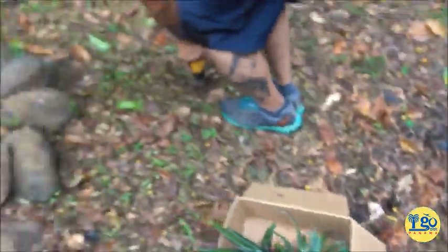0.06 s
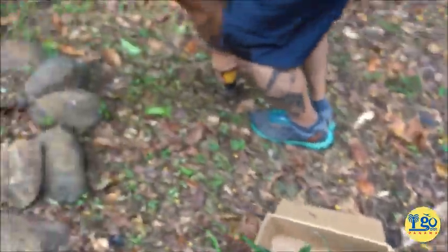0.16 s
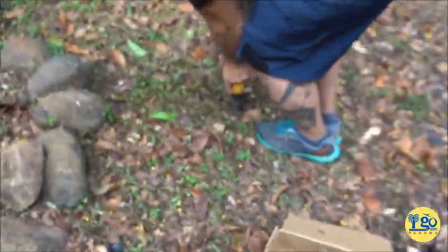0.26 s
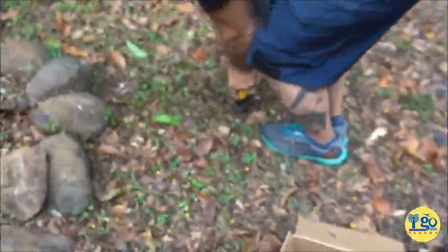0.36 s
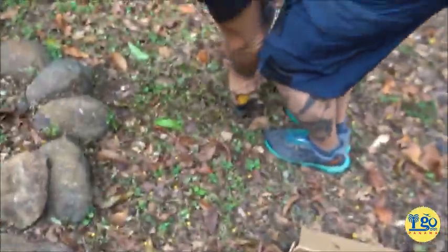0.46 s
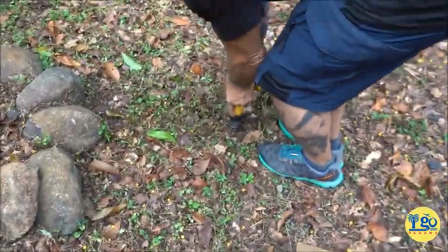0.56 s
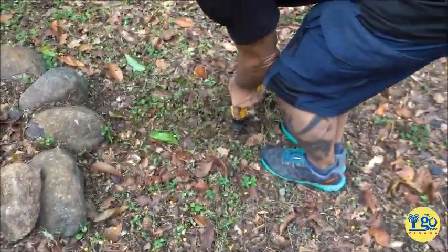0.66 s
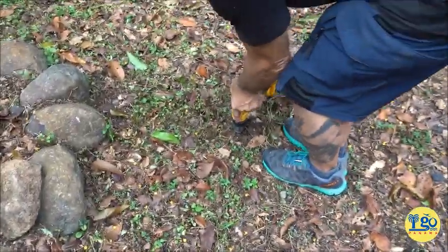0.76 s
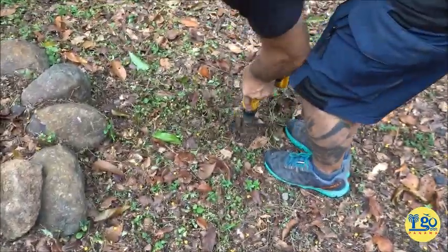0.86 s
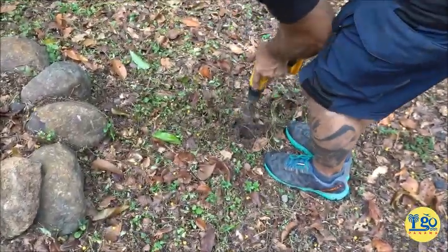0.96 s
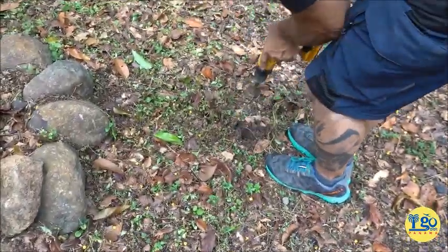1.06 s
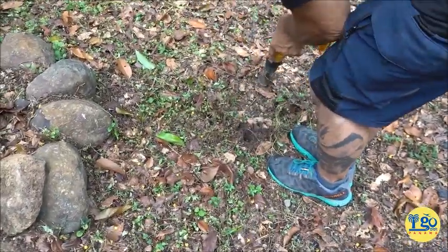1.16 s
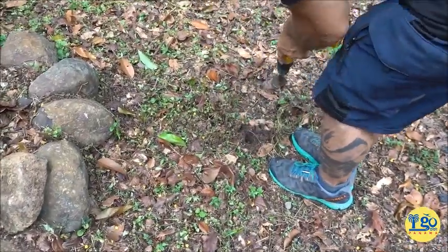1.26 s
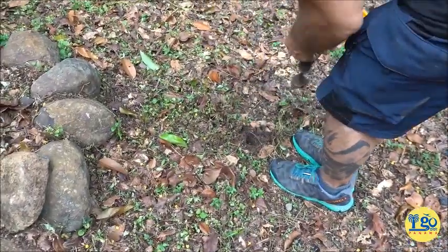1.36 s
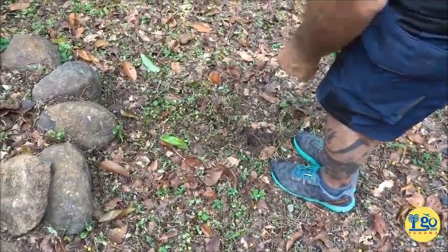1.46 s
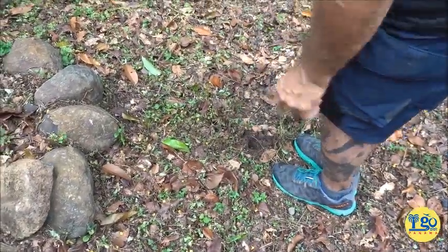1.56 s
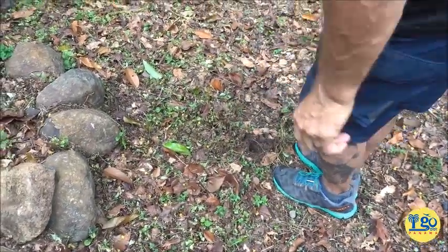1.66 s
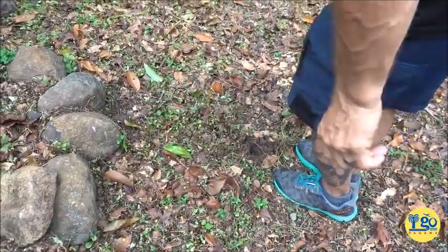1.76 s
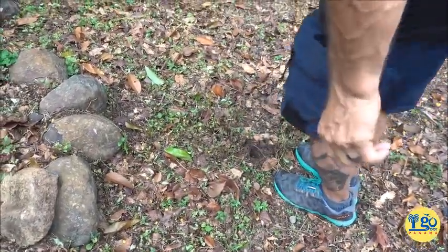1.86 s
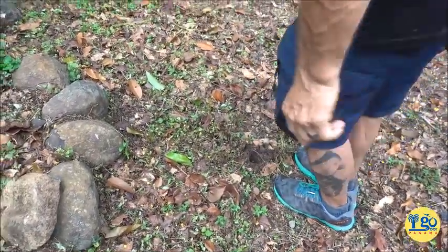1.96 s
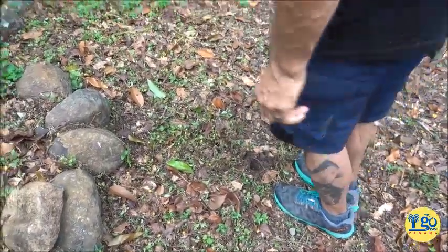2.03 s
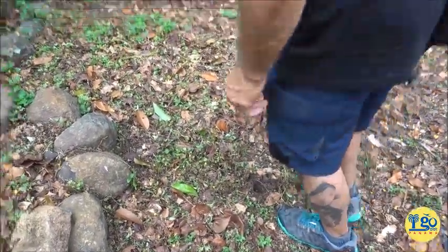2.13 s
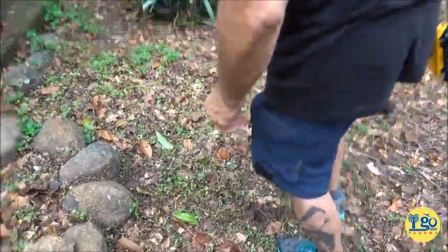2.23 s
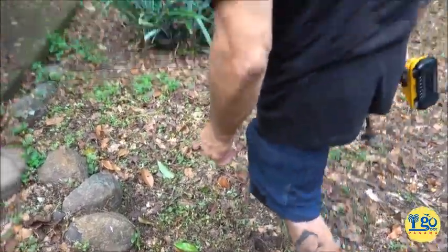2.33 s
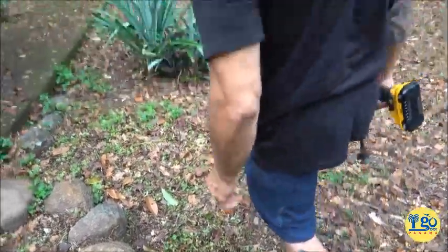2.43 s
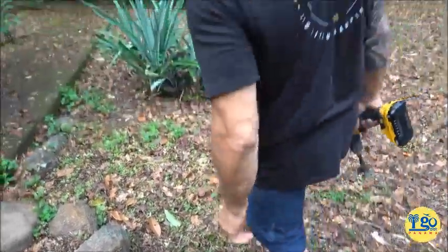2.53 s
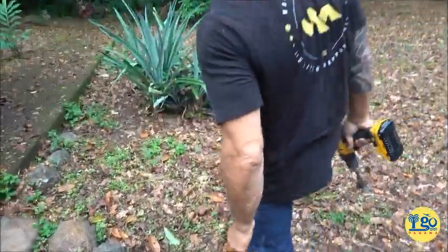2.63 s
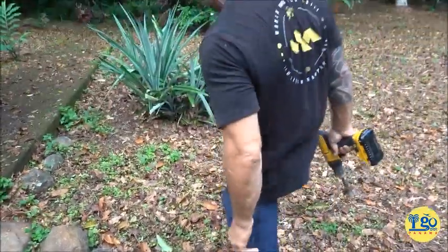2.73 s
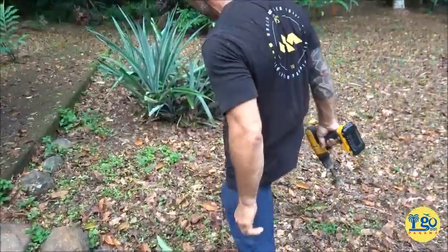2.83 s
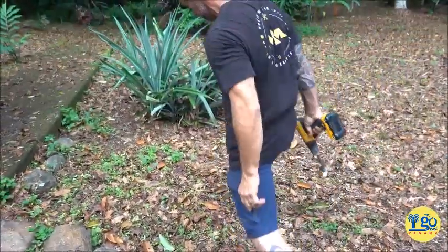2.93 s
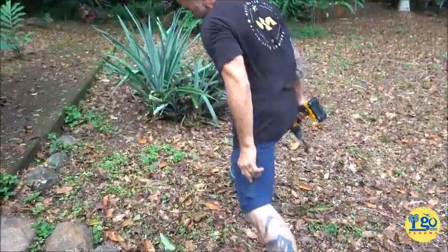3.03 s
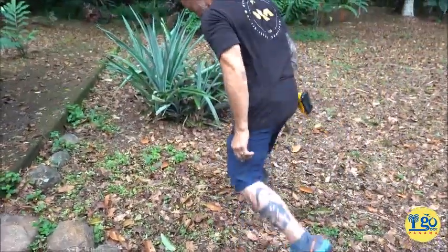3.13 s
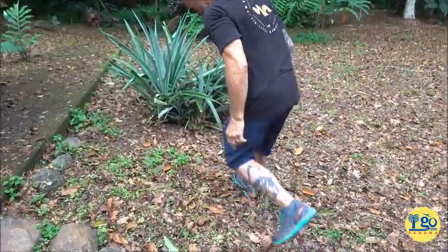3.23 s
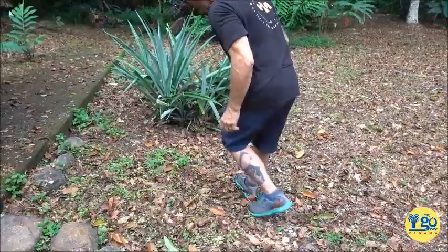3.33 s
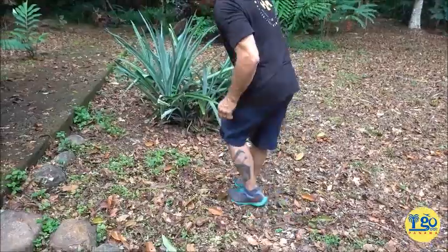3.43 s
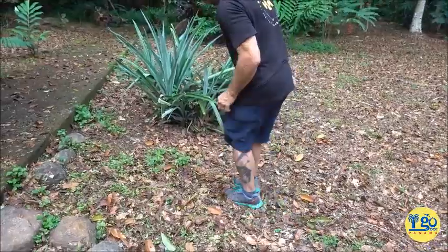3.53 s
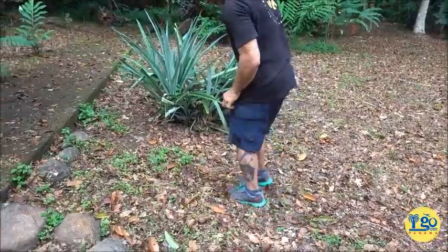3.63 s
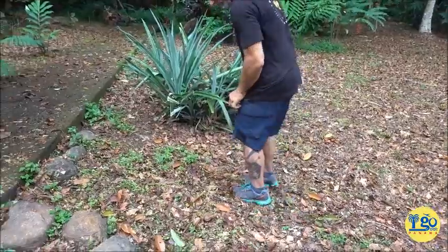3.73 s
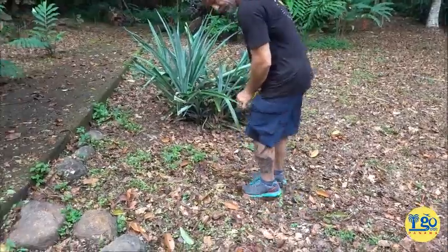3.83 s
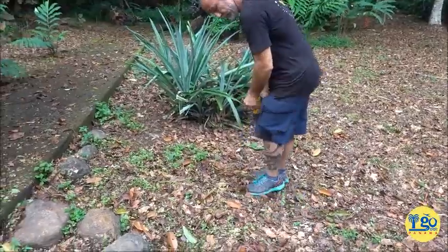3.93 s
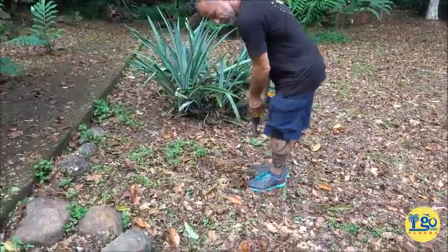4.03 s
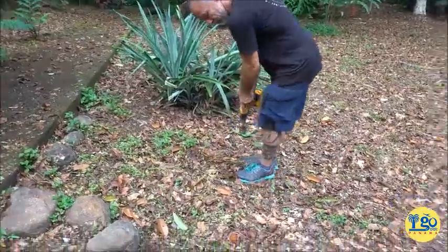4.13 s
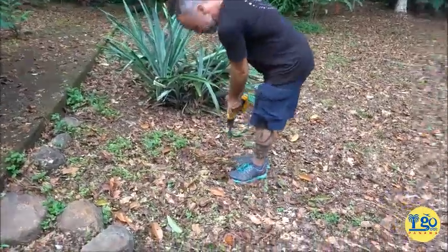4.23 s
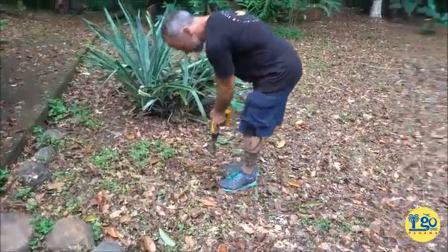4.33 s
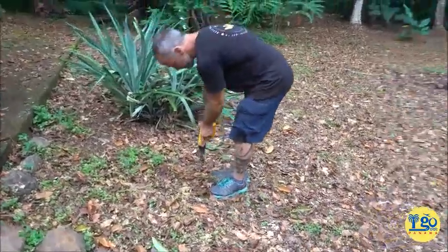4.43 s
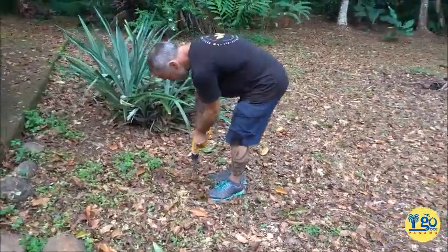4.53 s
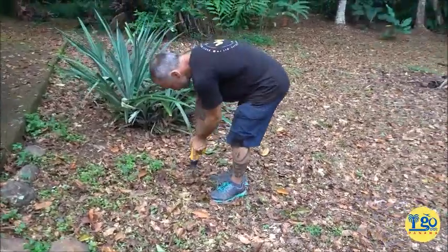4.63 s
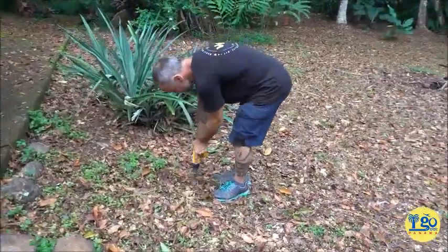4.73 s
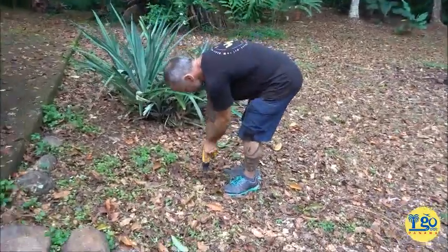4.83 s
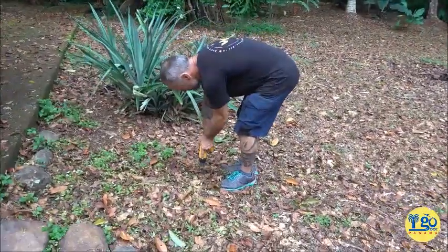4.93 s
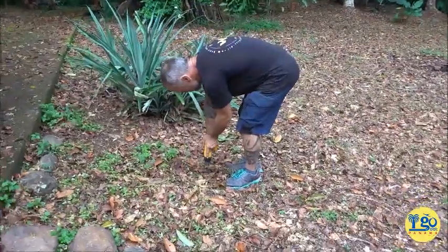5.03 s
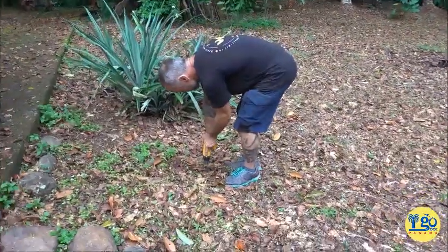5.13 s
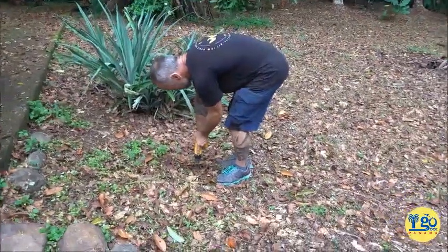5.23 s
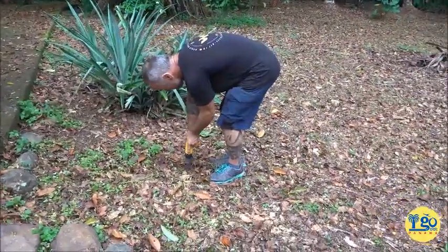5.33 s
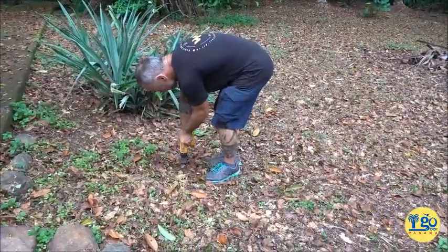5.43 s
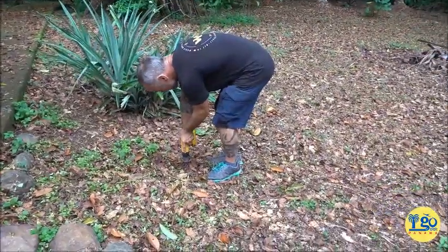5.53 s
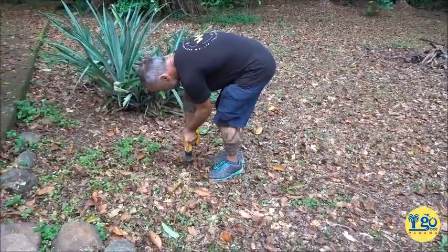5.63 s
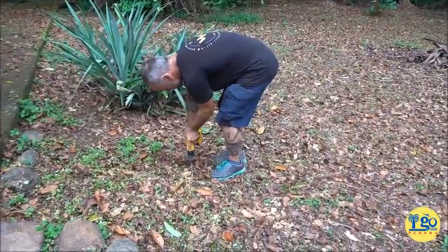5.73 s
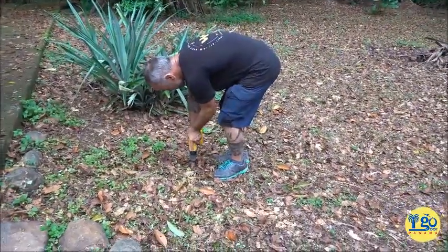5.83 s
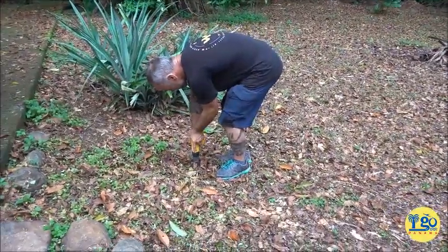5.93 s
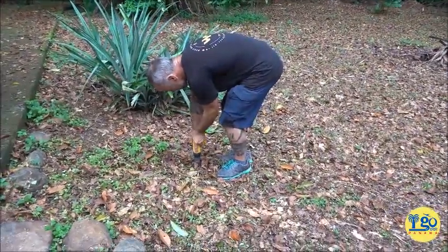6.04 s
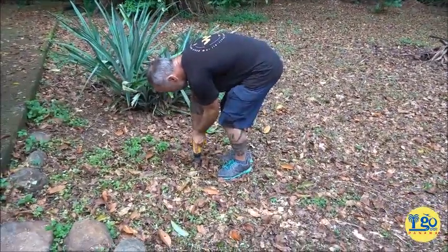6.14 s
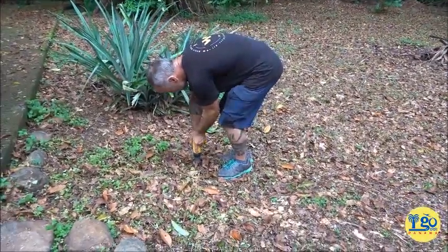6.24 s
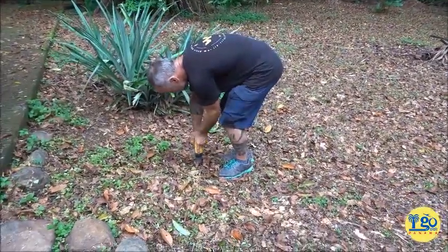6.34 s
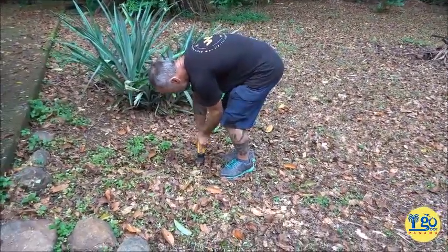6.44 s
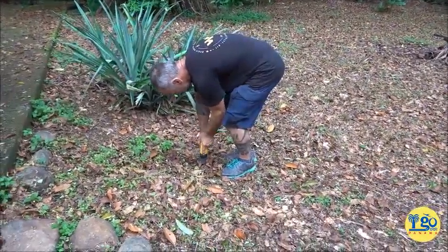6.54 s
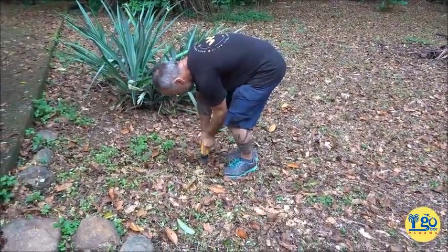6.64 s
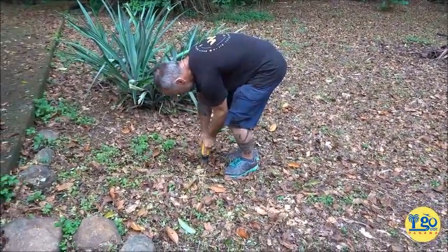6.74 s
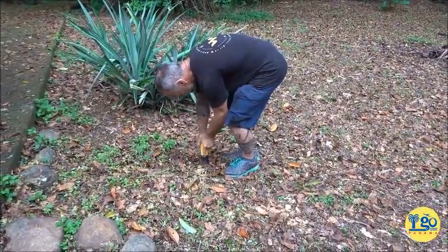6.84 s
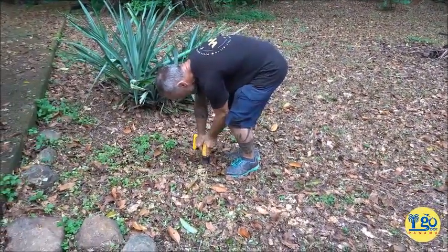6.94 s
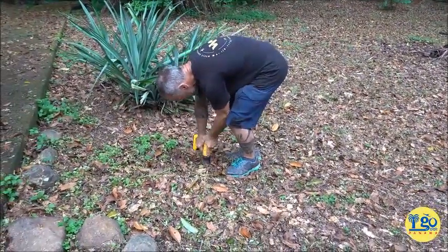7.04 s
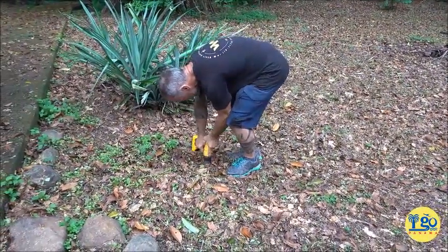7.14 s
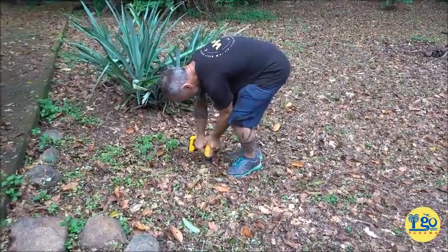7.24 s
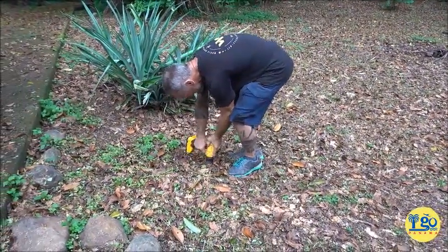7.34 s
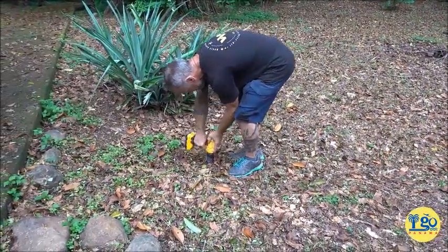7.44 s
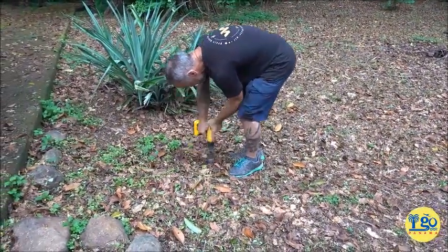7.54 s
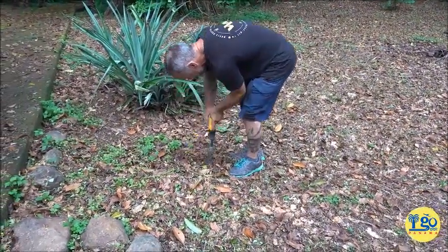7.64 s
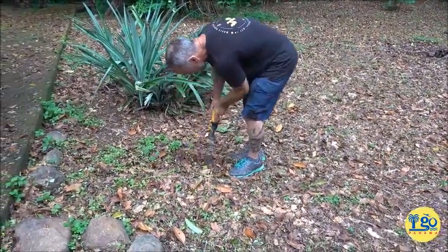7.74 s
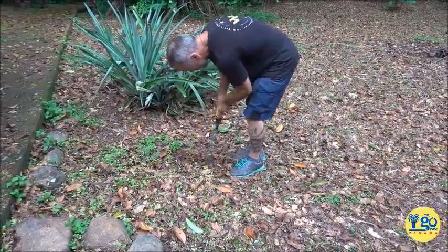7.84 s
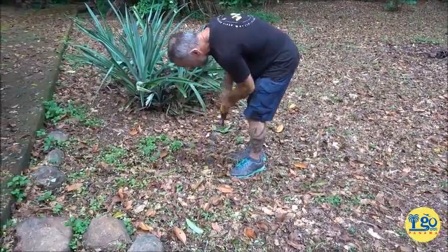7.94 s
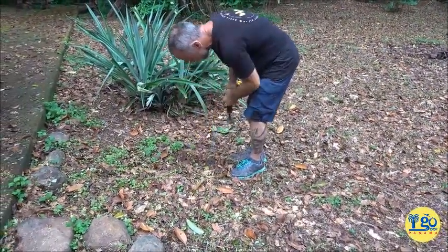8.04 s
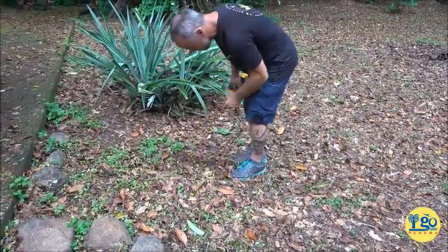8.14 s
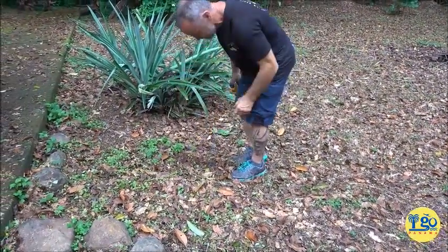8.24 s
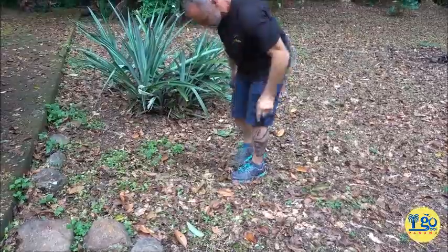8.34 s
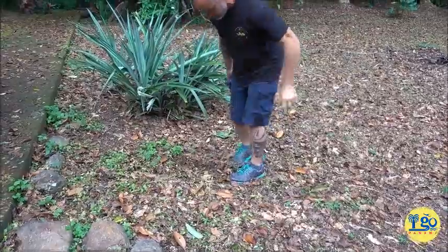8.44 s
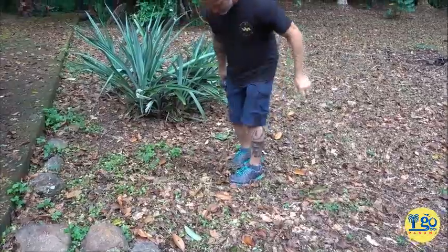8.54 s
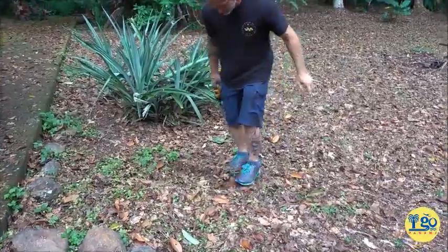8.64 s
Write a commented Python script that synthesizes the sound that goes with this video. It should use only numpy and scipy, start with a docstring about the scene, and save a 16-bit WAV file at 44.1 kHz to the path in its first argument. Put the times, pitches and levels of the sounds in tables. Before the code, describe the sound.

Outdoors in a garden, high cicadas and crickets buzz constantly around a centred, fairly dry power tool. It opens mid-hammering, gritty and hollow, then rattles off in a few hard blows. Quiet leaf rustles and small twig cracks follow. A geared motor whine rises and wavers before another dense hammering run, which labours and slows. A sharp switch click, a last brief whirr with knocks, and soft leaves end it.

```python
"""An impact driver turns an auger bit in garden soil: it hammers in a near hole, then a few lone blows ring out.
Feet crunch over leaf litter and twigs snap; the motor whines up, hammers in a far hole, and its gears murmur.
A switch clicks, the motor spins up once more with lone blows, and the leaves rustle on to the end.
Cicadas and crickets sing throughout while something drones far off. Blows, grit, leaves and insects
are shaped noise and clicks; the motor adds sine tones that glide in pitch."""
import sys
import numpy as np
from scipy import signal
from scipy.fft import rfft, irfft, next_fast_len
from scipy.io import wavfile

SR = 44100
rng = np.random.default_rng(int(sys.argv[2]) if len(sys.argv) > 2 else 0)


def transcribe(u):
    """Save the signal u as a 16-bit wav file named by the first command-line argument.

    u: samples, shape (n,) or (channels, n), limited to [-1, 1]; the rate is SR.
    q: integer samples, one column per channel.
    """
    v = np.clip(np.atleast_2d(u).T, -1, 1)
    q = np.round(v * 32767).astype(np.int16)
    wavfile.write(sys.argv[1], SR, q)


N = 383229
TIME = np.arange(N) / SR   # s
SIZE = next_fast_len(N + 4096)   # transform length, with room for filter tails
HZ = np.maximum(np.arange(SIZE // 2 + 1) * SR / SIZE, 1)
LOW_CUT_HZ = 340   # for the switch, the leaves and the short sounds among them

# Hammering runs, near hole then far hole. Each row: start in seconds, base level in dB, low thud in dB (before
# a fixed lift), hollow knock in dB, treble in dB, share of grinding from 0 to 1.
HAMMER_RUNS = [
    [(0.0, -29.5, 1.5, 10, 0.5, 1), (0.1, -25, -4, 10, 0, 0.4), (0.22, -25, -3.5, 1, -3, 0.57),
     (0.272, -25.5, -4, 4, 0, 0.38), (0.34, -28.5, -5.5, -2, -1, 1), (0.42, -27.5, 1, -5.5, -0.5, 0.78),
     (0.55, -29, -4, 3, -0.5, 0.74), (0.656, -28.5, -6, -12.5, -3, 1), (0.725, -40, -6, 3, -4.5, 1)],
    [(6.061, -28, -8.5, 9, -2, .15), (6.14, -33.5, -6, 10.5, 6, 0.4), (6.2, -30, -8.5, 2.5, 6.5, .25),
     (6.274, -29, -5.5, 3.5, 4, 0.5), (6.33, -28.5, -2, 0.5, 2.5, 0.3), (6.5, -29.5, 1.5, 6.5, 4, 0.23),
     (6.6, -24, -4.5, -8.5, -3, 0.7), (6.72, -26, -5.5, -11.5, -1.5, 0.2), (6.83, -27, 0.5, 0, 0.5, 0.35),
     (6.92, -27.5, -1.5, 1.5, -1, 0.6), (7.0, -29, -4.5, -1, 0, 0.6), (7.1, -32, -3.5, -20.5, 2, 0.6),
     (7.2, -35.5, -5, -21, 3.5, 1), (7.215, -40, -6, -2, 2.5, 1)],
]
# Colour of the hammering in the near hole and the far hole. Each row: frequency in Hz, relative level in dB per Hz.
HOLE_TONES = [
    [(24, -75.5), (40, -37), (123, -16), (203, -28), (335, -14), (380, -17.5), (582, 3), (693, 5.5),
     (959, -7.5), (1140, -2), (1750, -1.5), (2740, 1.5), (4200, -0.5), (8670, -6), (15800, -15)],
    [(24, -59), (40, -44), (96, -31), (136, -19), (319, -10), (362, -6.5), (488, -11.5), (567, -2),
     (1200, 7), (2140, 3), (3520, 4), (5260, -0.5), (8240, -4.5), (14700, -16), (15800, 0)],
]
# Stereo width of the garden. Each row: frequency in Hz, side minus mid in dB (before any shift).
GARDEN_WIDTH = [(60, -10), (130, -11), (290, -18.5), (640, -8.5), (1410, -11.5), (3100, -8), (6820, -1),
                (15000, 9.5)]


def from_db(db):
    """Turn decibels into gain."""
    return 10 ** (np.asarray(db) / 20)


def rms_one(x):
    """Scale to an rms (average strength) of 1."""
    return x / np.sqrt(np.mean(x ** 2) + 1e-20)


def in_time(rows):
    """Draw straight lines between table rows: one value per sample for each column after the time."""
    s, *columns = np.transpose(rows)
    return [np.interp(TIME, s, c) for c in columns]


def per_run(tables, values):
    """Hold one value through each run."""
    held = [(rows[end][0], v) for rows, v in zip(tables, values) for end in (0, -1)]
    return in_time(held)[0]


def gate(tables, fall_s):
    """Open while a table lasts, with smoothed edges, and die away after it."""
    on = sum((TIME >= rows[0][0]) & (TIME <= rows[-1][0]) for rows in tables) + 1e-9
    r = np.exp(-1 / (fall_s * SR))
    return signal.lfilter([1 - r], [1, -r], on, zi=[on[0] * r])[0]


def at_hz(points, hz=HZ):
    """Read a spectrum table at the given frequencies, on a logarithmic pitch scale."""
    table_hz, table_db = np.array(points).T
    return np.interp(np.log(hz), np.log(table_hz), table_db)


def hump(hz, width_hz):
    """Give the dB response of a resonance applied twice."""
    return -20 * np.log10(1 + (2 * (HZ - hz) / width_hz) ** 2)


def colour(x, db):
    """Filter to the given dB response without sounding ahead of time (minimum phase)."""
    cepstrum = irfft(np.log(from_db(db)), SIZE)
    cepstrum[1:SIZE // 2] *= 2
    cepstrum[SIZE // 2 + 1:] = 0
    return irfft(rfft(x, SIZE) * np.exp(rfft(cepstrum)), SIZE)[:N]


def split(x, hz):
    """Divide a sound into its low and high parts."""
    return [signal.sosfilt(signal.butter(3, hz, kind, fs=SR, output="sos"), x) for kind in ("low", "high")]


def drift(rate):
    """Wander at random with a spread of 1; rate in Hz sets how fast."""
    r = np.exp(-80 * np.pi * rate / SR)   # worked out on every 40th sample
    slow = signal.lfilter([1], [1, -2 * r, r * r], rng.standard_normal(N // 40 + 2002))[2000:]
    return np.interp(np.arange(N) / 40, np.arange(len(slow)), rms_one(slow))


def bursts(clicks, decay_s):
    """Let each click open a short dying burst of noise."""
    envelope = signal.lfilter([1], [1, -np.exp(-1 / (decay_s * SR))], clicks + 1e-18)
    return envelope * rng.standard_normal(N)


def grains(spread_db, per_s, decay_s):
    """Crackle at random, with a few strong grains."""
    sizes = from_db(spread_db * np.minimum(rng.exponential(1, N), 5))
    return rms_one(bursts(sizes * (rng.random(N) < per_s / SR), decay_s))


def smeared(tables, width_hz):
    """Blur a gliding tone into a moving band of noise by letting its size and phase wander."""
    hz, level_db = in_time(sum(tables, []))
    phase = 2 * np.pi * np.cumsum(hz) / SR
    band = drift(width_hz) * np.sin(phase) + drift(width_hz) * np.cos(phase)
    return from_db(level_db) * gate(tables, 0.0017) * band


def body(x, tone):
    """Colour a sound as the housing, bit and soil do: a broad tone plus resonances."""
    # Resonances of housing and bit. Each row: frequency in Hz, width in Hz, lift in dB.
    resonances = [(1040, 900, 1), (1580, 93, 4.5), (2090, 97, -4), (2323, 27, 6), (2960, 200, 3),
                  (3545, 34, 2.5)]
    rings = sum(db / (1 + (2 * (HZ - hz) / width) ** 2) for hz, width, db in resonances)
    return colour(x, at_hz(tone) + rings)


def hammer():
    """The hammer strikes the anvil at the blow rate; gears and soil grind in between."""
    # Blow rate, near hole then far hole. Each row: time in seconds, blows per second.
    blow_rates = [
        [(0.0, 109), (0.1, 112), (0.34, 104), (0.4, 119), (0.656, 110), (0.725, 88)],
        [(6.068, 158.6), (6.15, 152.3), (6.24, 142.5), (6.31, 130), (6.4, 141.4), (6.5, 149.7), (6.6, 144.1),
         (6.68, 134.7), (6.76, 115.2), (6.82, 101.7), (6.89, 94.4), (6.93, 62.9), (7.0, 75.8), (7.04, 78),
         (7.09, 59.7), (7.2, 66.3)],
    ]
    # Timing scatter in each run, in blows, at the brisk rate; slower blows scatter more.
    scatter = (0.16, 0.012)
    # Times in seconds of blows that only graze the anvil.
    slip_times = (6.094, 6.199, 6.254, 6.292, 6.345, 6.402, 6.903)
    # Blows are duller than the grinding. Each row: frequency in Hz, level in dB.
    blow_tilt = [(300, -0.5), (1500, -4), (4000, -6), (9000, -3)]
    # The tool rocks at the blow rate. Each row: multiple of that rate, dB relative to the thud (before rock_db).
    rock_orders = [(1, -52), (2, -47), (3, -45), (4, -47)]
    # Gear whine smeared by the load. Each row: time in seconds, centre in Hz, level in dB (before its swell).
    strained_gears = [
        [(0.0, 2610, -49.5), (0.22, 2410, -40), (0.3, 2620, -35.5), (0.354, 2333, -39.5), (0.43, 2752, -34),
         (0.64, 2350, -32.5)],
        [(6.12, 3710, -47), (6.17, 3028, -44), (6.274, 3570, -37), (6.33, 3284, -43), (6.6, 3500, -44),
         (6.72, 3650, -35), (6.8, 3067, -40.5), (6.9, 3000, -46), (7.01, 3344, -58), (7.17, 2980, -44.5),
         (7.21, 3040, -43)],
    ]
    brisk_per_s, wobble_blows = 140, .05   # the wobble is a slow wavering of the timing
    slip_db, rock_db = -12, 19
    patchy_db, patchy_hz = 1.0, 25   # parts of the digging swell on their own
    strain_width_hz, strain_swell_db = 300, 2

    level_db, thud_db, knock_db, treble_db, grind = in_time(sum(HAMMER_RUNS, []))
    per_s, = in_time(sum(blow_rates, []))
    turns = np.cumsum(per_s) / SR   # blows counted so far
    turns = turns - turns[round(blow_rates[1][0][0] * SR)]   # line the count up with the start of the far run
    turns = turns + per_run(HAMMER_RUNS, scatter) * (brisk_per_s / per_s) ** 2 * drift(60)
    turns = turns + wobble_blows * drift(9)

    count = np.floor(np.maximum.accumulate(turns))
    struck = np.diff(count, prepend=np.floor(turns[0]))
    struck = struck * np.sqrt(brisk_per_s / per_s)   # slower blows hit harder
    slips = sum(np.abs(TIME - s) < .004 for s in slip_times)
    struck = struck * from_db(1.2 * rng.standard_normal(N) + slip_db * slips)
    # noise differs from blow to blow; the added push repeats in one direction
    blows = rms_one(colour(bursts(struck, 0.0009) + 7 * struck, at_hz(blow_tilt)))

    grind = np.clip(grind, 0, 1)
    grit = grains(3.1, 8100, 0.00031) * from_db(1.2 * drift(40) + slip_db / 2 * slips)
    raw = np.sqrt(1 - grind) * blows + np.sqrt(grind) * grit
    out = 0
    for run, tone in zip(HAMMER_RUNS, HOLE_TONES):
        low, high = split(rms_one(body(raw, tone)), 777)
        middle, bright = split(high, 2400)
        hollow, hard = split(middle, 1002)
        thud = from_db(thud_db + 10.5) * low
        knock = from_db(knock_db) * hollow + hard
        treble = -from_db(treble_db) * bright
        digging = sum(from_db(patchy_db * drift(patchy_hz)) * part for part in (thud, knock, treble))
        out = out + gate([run], 0.0051) * digging

    rocking = 0
    for k, db in rock_orders:
        rocking = rocking + from_db(db + thud_db + 4.5 * drift(22)) * np.sin(2 * np.pi * k * turns)
    out = out + from_db(rock_db) * gate(HAMMER_RUNS, 0.0044) * split(rocking, 184)[1]
    whine = from_db(strain_swell_db * drift(16.0)) * smeared(strained_gears, strain_width_hz)
    return from_db(level_db) * out + whine


def lone_blows():
    """The same hammer hits singly as the bit catches: a rattle swells to a tick and dies."""
    # Each row: start in seconds, strength in dB (before a fixed cut), low thud in dB relative to it
    # (before a further cut), rise in seconds.
    single_hits = [(0.945, -20.5, 5, .0005), (0.959, -12.5, -6.5, .001), (0.968, -8, -10, .002),
                   (0.975, -14.5, -3.5, .001), (0.986, -16.5, -18, .0005), (0.99, -14, -1, 0.0015),
                   (1.002, -22.5, -1.5, .0005), (1.011, -17.5, 2, .003), (1.015, -16.5, -7.5, 0.0026),
                   (1.024, -12.5, -7.5, 0.00072), (1.041, -40, -1, 0.0011), (7.445, -27.5, 9.5, .002),
                   (7.459, -27, 11, 0.0025), (7.471, -31, 12.5, 0.0025), (7.61, -24, 9, .004),
                   (7.625, -12, -3, 0.003), (7.642, -14, -11.5, 0.0035), (7.651, -16.5, 5, 0.0039),
                   (7.659, -25, 7, .003), (7.675, -27, 1, .004), (7.683, -26, 1, 0.00032)]
    fall_s, tick = 0.0055, 4.7   # the tick is measured against the rattle
    knock_hz, knock_width_hz, knock_db = 1520, 250, 6   # the bit rings as it leaves the far hole

    unit = np.max(np.abs(body(np.arange(N) == 0, HOLE_TONES[1])))   # peak of one bare click
    after, force = np.arange(2000) / SR, np.zeros((2, N))   # force: one row for thud, one for the rest
    noises = rng.standard_normal((len(single_hits), len(after)))
    for (s, strength_db, thud_db, rise_s), white in zip(single_hits, noises):
        rattle = white * np.minimum(after / rise_s, np.exp(np.minimum(rise_s - after, 0) / fall_s))
        rattle[round(rise_s * SR)] = tick
        gains = from_db([[strength_db + thud_db - 14], [strength_db - 12.0]])
        at = round(s * SR)
        force[:, at:at + len(after)] += gains * rattle
    out = sum(split(body(x, HOLE_TONES[1]), 1300)[part] for part, x in enumerate(force)) / unit
    ringing = colour(out, knock_db / (1 + (2 * (HZ - knock_hz) / knock_width_hz) ** 2))
    far_start_s = HAMMER_RUNS[1][0][0]
    return split(np.where(TIME > far_start_s, ringing, out), 290)[1]


def motor():
    """Gears and fan hiss, mesh tones lag behind the pitch they head for, and the speed control sings thinly."""
    # Spells of spinning. Each row: time in seconds, gear and fan noise in dB.
    spins = [
        [(0.63, -34), (0.725, -36.5)],
        [(0.785, -43.5), (0.837, -28.5), (1.05, -37)],
        [(5.125, -54), (5.217, -37), (5.419, -37.5), (5.707, -39), (5.83, -41.5), (5.905, -33), (6.035, -32.5),
         (6.15, -38.5), (6.35, -40), (6.6, -36)],
        [(7.22, -54), (7.43, -51), (7.46, -37), (7.524, -33.5), (7.6, -38.5), (7.7, -44.5)],
    ]
    # Colour of that noise. Each row: frequency in Hz, relative level in dB per Hz.
    noise_tone = [(180, -29), (300, -21.5), (493, -27.5), (536, -20.5), (1130, -2), (1990, -2.5), (2770, 0),
                  (3610, 1.5), (3990, -0.5), (4550, -3), (10600, -5.5), (14500, -10), (15800, -1)]
    # Whine glides: spin-ups, a run-down and a coast. Each row: time in seconds, pitch the whine heads for in Hz,
    # base whine level against the gear noise in dB.
    glides = [
        [(0.63, 2280, -2), (0.655, 2280, -6), (0.68, 2200, -16), (0.69, 1500, 5), (0.715, 500, -2)],
        [(0.8, 1900, -14), (0.81, 2000, -1), (0.813, 4258, 1), (0.828, 4258, -2), (0.84, 4250, -13),
         (0.875, 4236, -14)],
        [(5.16, 1000, -16), (5.21, 1480, -13), (5.27, 1750, -11), (5.32, 2750, -10), (5.345, 2820, -7),
         (5.44, 2750, -6), (5.46, 2600, -9), (5.51, 2460, -10), (5.57, 2490, -7), (5.63, 2390, -6),
         (5.665, 2150, -6), (5.69, 2080, -13), (5.715, 2050, -11), (5.745, 1850, -10), (5.834, 1830, -4)],
        [(5.8341, 1830, -4), (5.852, 4233, 3), (5.89, 4220, -8), (6.06, 4176, -10), (6.1, 3800, -5),
         (6.2, 3700, -4), (6.28, 3350, 2), (6.37, 3520, 1), (6.6, 3630, 2)],
        [(7.22, 1800, -5), (7.24, 1960, -3), (7.43, 1940, -4)],
        [(7.455, 1950, -13), (7.47, 2300, -11), (7.5, 3700, -9), (7.53, 3900, -13), (7.6, 3900, -18)],
    ]
    # Fast unsteadiness of pitch in each glide, as a share of the pitch.
    flutter = (.025, .014, .009, .015, .012, .015)
    # Strength in dB added to the overtones above the whine in each glide.
    overtone_db = (-12, -8, 2, 4, -10, -8)
    # Gear meshes, as multiples of the whine's pitch.
    mesh_orders = (.195, .41, .61, .825, 1.0, 1.21, 1.42, 2.0)
    # Base level of each mesh tone in dB.
    mesh_db = (2, -6, -5, -11, 0, -14, -12, -3)
    # How tones leave the housing. Each row: frequency in Hz, level in dB.
    housing_db = [(550, -60), (800, -20), (1100, -4), (1900, -8), (2300, -4), (2750, 2), (3200, -3),
                  (3700, -2), (4150, 2), (4500, -10), (5000, -9), (5500, -15), (5900, -5), (6500, -20)]
    # The speed control sings while the trigger is part pulled. Each row: time in seconds, level in dB.
    control_tone = [
        [(0.785, -29), (0.8, -45)],
        [(0.85, -38), (0.87, -40)],
        [(5.125, -62), (5.2, -45), (5.3, -43), (5.72, -54)],
    ]
    # Gears murmur after the trigger is let go. Each row: time in seconds, centre in Hz, level in dB.
    gear_murmur = [
        [(7.215, 1298, -58), (7.24, 1325, -46), (7.285, 1310, -59.5), (7.302, 1280, -50.5), (7.328, 1220, -56),
         (7.366, 1306, -44.5), (7.394, 1326, -56), (7.445, 1152, -43)],
    ]
    lag_s, control_hz = 0.028, 3907.5

    noise = colour(grains(0.91, 8200, 0.0017), at_hz(noise_tone))
    level_db, = in_time(sum(spins, []))
    out = from_db(level_db) * gate(spins, 0.0033) * rms_one(noise)

    aim_hz, whine_db = in_time(sum(glides, []))
    lag = np.exp(-1 / (lag_s * SR))
    pitch_hz = signal.lfilter([1 - lag], [1, -lag], aim_hz, zi=[aim_hz[0] * lag])[0]
    unsteady = .006 * drift(30) + per_run(glides, flutter) * drift(150)
    phase = 2 * np.pi * np.cumsum(pitch_hz * (1 + unsteady)) / SR
    tones, above_db = 0, per_run(glides, overtone_db)
    for k, db in zip(mesh_orders, mesh_db):
        tone_db = db + (k > 1) * above_db + at_hz(housing_db, k * pitch_hz)
        tone_db = tone_db + 2.8 * drift(30) + 3 * drift(160)
        tones = tones + from_db(tone_db) * np.sin(k * phase)
    out += np.sqrt(2) * from_db(level_db + whine_db) * gate(glides, 0.0032) * tones

    control = np.sqrt(2) * np.sin(2 * np.pi * control_hz * TIME)
    control_db, = in_time(sum(control_tone, []))
    out += from_db(control_db) * gate(control_tone, 0.006) * control
    return out + smeared(gear_murmur, width_hz=260)


def short_sounds(rows, t60, crack):
    """A sharp tick and a dying noise burst (60 dB down after t60 seconds) excite a broad resonance."""
    tick, sharpness = 9, 2.2   # tick against the noise after it; resonance applied twice
    out, length = np.zeros(N), 4000
    for (s, db, hz), white in zip(rows, rng.standard_normal((len(rows), length))):
        burst = white * from_db(-60 * np.arange(length) / SR / t60)
        burst[0] = tick
        ring = signal.iirpeak(hz, sharpness, fs=SR)
        rung = signal.lfilter(*ring, signal.lfilter(*ring, burst))
        burst = rung + crack * burst   # crack: share of bright noise that does not ring
        at = round(s * SR)
        out[at:at + length] += (from_db(db) * burst / np.max(np.abs(burst)))[:N - at]
    return out


def litter():
    """Feet and falling soil rustle dry leaves in fine grains; each rustle has its own share of low crunch."""
    # Each row: peak time in seconds, level in dB, low part in dB relative to it (before a fixed lift),
    # rise in seconds, fall in seconds.
    rustles = [(0.75, -51.5, 10.5, 0.021, 0.21), (1.04, -44.5, 1, 0.014, 0.1),
               (1.2, -54.5, -1.5, 0.07, 0.11), (1.43, -56, -35.5, 0.045, 0.054),
               (2.04, -50, -2, 0.028, .04), (2.2, -58.5, 2, 0.24, 0.16), (2.385, -47.5, -3, 0.027, 0.022),
               (2.9, -51.5, -0.5, 0.027, 0.1), (3.1, -52, -4.5, 0.082, 0.15),
               (3.36, -51.5, -3.5, 0.033, 0.038), (3.47, -39.5, -5, 0.053, 0.041),
               (3.58, -51, -1.5, 0.086, 0.17), (3.87, -50.5, 0, 0.12, 0.11),
               (3.97, -56.5, -10.5, 0.0382, 0.097), (4.219, -50, 6.5, 0.061, 0.034),
               (4.33, -60.5, 6, 0.08, 0.11), (4.54, -58.5, 2, 0.046, .04), (4.67, -47, 1.5, 0.037, 0.086),
               (4.74, -53.5, -12, 0.082, 0.11), (4.86, -55.5, -4.5, 0.045, 0.11),
               (7.23, -52, 2, 0.026, 0.11), (7.318, -44, -7, 0.0067, .015), (7.71, -51.5, -4, 0.018, 0.14),
               (7.83, -59, -2, .05, 0.34), (8.4, -53.5, -6, 0.14, 0.15), (8.69, -53, -0.5, 0.053, .05)]
    # Colour of the leaves. Each row: frequency in Hz, relative level in dB per Hz.
    leaf_tone = [(260, -39), (450, -15.5), (832, -3.5), (1050, -3), (1410, 2.5), (2510, 3.5), (3520, 4),
                 (5500, 1.5), (6500, -1.5), (8450, -13), (14300, -120)]
    roundness = 1.9   # 1 = pointed swell, 2 = bell
    stir_db, stir_low_db = -64.5, -6.5   # leaves never lie quite still; the low part is relative

    high_power, low_power = from_db(2 * stir_db), from_db(2 * (stir_db + stir_low_db))
    for s, db, low_db, rise_s, fall_s in rustles:
        away = np.minimum(np.where(TIME < s, (s - TIME) / rise_s, (TIME - s) / fall_s), 8)
        power = from_db(2 * db) * np.exp(-2 * away ** roundness)
        high_power = high_power + power
        low_power = low_power + from_db(2 * low_db) * power
    crackle = grains(2.5, 2500, 0.0015) * from_db(1.2 * drift(22.4))
    low, high = split(rms_one(colour(crackle, at_hz(leaf_tone))), 1040)
    return from_db(8.5) * np.sqrt(low_power) * low + np.sqrt(high_power) * high


def insects():
    """A far chorus blurs to wide noise; the nearest cicada keeps its clicks; crickets hold one narrow band."""
    # Cicada loudness. Each row: time in seconds, level in dB (before the near and far shifts).
    cicada_levels = [(0.0, -39.5), (0.46, -43), (0.7, -38), (2.0, -38.5), (2.76, -39.5), (4.21, -38),
                     (5.25, -38.5), (5.83, -40), (6.7, -42.5), (7.02, -39), (7.7, -39.5), (8.69, -39)]
    # Colour of the far chorus. Each row: frequency in Hz, relative level in dB per Hz.
    chorus_tone = [(200, -51), (700, -27), (4060, -14.5), (6900, -45), (7270, 6), (7470, -20), (7740, 6),
                   (8150, 5.5), (9330, 9.5), (10600, 9.5), (10900, 8.5), (13800, -7.5), (15200, -10),
                   (15800, -38.5)]
    # Two drums with two ribs each. Each row: place in the cycle from 0 to 1, click level in dB (before scatter).
    rib_clicks = [(0, 0), (.075, -3), (.367, -1), (.44, -3)]
    cycles_per_s, cycle_start_s = 44.96, 1.417
    tymbal_hz, tymbal_width_hz = 10450, 1700
    cricket_hz, cricket_width_hz, cricket_db = 7563, 350, -47.5
    near_db, far_db, far_side_db = 0.5, -1.5, -1   # the nearest cicada sits to the left; the far chorus is wide
    near_right = -0.28   # from far left the clicks reach the right channel weaker and turned over

    chorus_db, = in_time(cicada_levels)
    cycle = (TIME - cycle_start_s) * cycles_per_s
    clicks = 0
    for place, db in rib_clicks:
        clicks = clicks + from_db(db) * np.diff(np.floor(cycle - place), prepend=np.floor(cycle[0] - place))
    clicks = clicks * from_db(rng.standard_normal(N))
    near = bursts(clicks, .0006) + 3 * clicks
    near = rms_one(colour(near, hump(tymbal_hz, tymbal_width_hz)))
    near = near * from_db(chorus_db + near_db + 0.51 * drift(0.94))
    out = near * [[1], [near_right]]

    throb = from_db(0.86 * drift(50))
    far_chorus = (chorus_db + far_db, at_hz(chorus_tone), 1)
    crickets = (cricket_db + 0.38 * drift(0.79), hump(cricket_hz, cricket_width_hz), throb)
    for level_db, tone, beat in (far_chorus, crickets):
        mid, side = rng.standard_normal((2, N)) * beat
        mid = colour(mid, tone)
        side = colour(side, tone + at_hz(GARDEN_WIDTH) + far_side_db)
        out = out + from_db(level_db) / np.std(mid) * (mid + side * [[1], [-1]])
    return out


def drone():
    """Low far-off noise swells and sinks."""
    # Each row: time in seconds, level in dB.
    drone_levels = [(0.72, -64), (1.16, -72), (1.5, -82), (2.22, -73), (2.54, -77), (2.79, -65.5),
                    (3.05, -75.5), (3.3, -67.5), (3.49, -56.5), (3.75, -74.5), (4.2, -77), (4.39, -66.5),
                    (4.6, -67.5), (4.75, -76), (5.1, -68.5), (5.5, -70), (7.25, -74), (8.1, -68.5),
                    (8.2, -67), (8.4, -73), (8.69, -75.5)]
    # Each row: frequency in Hz, relative level in dB per Hz.
    drone_tone = [(59, -66), (100, -43), (155, -24), (172, -28), (200, -29), (355, -2), (508, -11.5),
                  (662, -8.5), (734, -11.5), (947, 1), (1150, -16), (1500, -65.5), (2530, -120)]
    return from_db(in_time(drone_levels)[0]) * rms_one(colour(rng.standard_normal(N), at_hz(drone_tone)))


def spread(x, side_db):
    """Ground and plants scatter sound: each band wanders in direction and differs between left and right."""
    spectrum, side = rfft(x, SIZE) * from_db(at_hz(side_db)), 0
    edges = [0, 500, 1000, 2000, 3000, 4200, 5600, 7000, 9000, SR]   # Hz
    for low, high in zip(edges, edges[1:]):
        band = spectrum * ((HZ >= low) & (HZ < high))
        turn = np.pi * drift(13.1)
        # 1j shifts the band by a quarter cycle, so the mix can turn its phase
        side = side + np.cos(turn) * irfft(band, SIZE)[:N] + np.sin(turn) * irfft(1j * band, SIZE)[:N]
    return x + split(side, 150)[1] * [[1], [-1]]


def scene():
    """The tool is near and centred, the garden is wide."""
    # The direction switch clicks over. Each row: start in seconds, peak in dB (before the low cut), centre in Hz.
    switch_click = [(7.312, -11.5, 1926)]
    # Twigs and stones, and at 5.359 s a short high blip as the motor whines up.
    # Each row: start in seconds, peak in dB (before the low cut), centre in Hz.
    snaps_and_blip = [(1.113, -32.5, 2560), (1.213, -41, 1970), (1.779, -43.5, 3036), (2.027, -46.5, 1000),
                      (2.036, -44, 603), (2.048, -37.5, 586), (2.094, -51.5, 704), (2.336, -54, 729),
                      (2.371, -37, 3930), (2.383, -44.5, 770), (2.605, -56, 1410), (2.626, -53.5, 1460),
                      (2.836, -50.5, 1660), (2.874, -50, 1630), (2.928, -46.5, 886), (2.946, -33.5, 3260),
                      (3.057, -39.5, 2600), (3.345, -37.5, 4500), (3.373, -41, 1350), (3.402, -32, 1380),
                      (3.428, -39, 3620), (3.452, -41.5, 1400), (3.556, -41, 817), (3.588, -45.5, 902),
                      (3.88, -45, 1500), (3.95, -45.5, 3130), (4.196, -35.5, 2094), (4.226, -34, 1127),
                      (4.356, -45.5, 893), (4.406, -39, 900), (4.561, -42, 1404), (4.608, -49, 1170),
                      (4.628, -43, 1905), (4.65, -36.5, 1386), (4.747, -37.5, 2760), (4.809, -40, 3230),
                      (4.886, -38.5, 3400), (5.359, -30.5, 4950), (7.812, -38, 1680), (8.308, -41, 3650),
                      (8.446, -30.5, 3590)]
    # Stereo width of the tool. Each row: frequency in Hz, side minus mid in dB.
    tool_width = [(60, -30), (130, -41), (290, -56), (640, -43.5), (1410, -33), (3100, -13), (6820, -6),
                  (15000, -28.5)]
    switch = split(short_sounds(switch_click, t60=0.01, crack=0.66), LOW_CUT_HZ)[1]
    tool = hammer() + lone_blows() + motor() + switch
    ground = split(litter() + short_sounds(snaps_and_blip, t60=0.017, crack=0.012), LOW_CUT_HZ)[1]
    ground = ground + split(drone(), 120)[1]
    return spread(tool, tool_width) + spread(ground, GARDEN_WIDTH) + insects()


def record(dry):
    """Left and right differ a little in the treble; rumble is cut, peaks are rounded, the top is cut steeply."""
    # Each row: frequency in Hz, left minus right in dB.
    balance_db = [(1500, 0), (4000, -.8), (6000, 0), (9000, .1), (13000, -.3)]
    rumble_cut_hz, limit, top_stop_hz = 126, .4, 16116
    channels = np.array([colour(x, sign * at_hz(balance_db) / 2) for x, sign in zip(dry, (1, -1))])
    channels = split(channels, rumble_cut_hz)[1]
    channels = limit * np.tanh(channels / limit)
    return signal.sosfilt(signal.cheby2(14, 70, top_stop_hz, fs=SR, output="sos"), channels)


dry = scene()
out = record(dry)
transcribe(out)
```